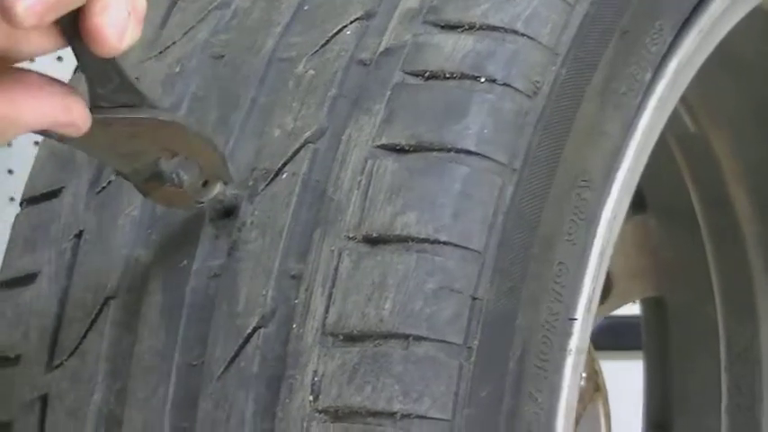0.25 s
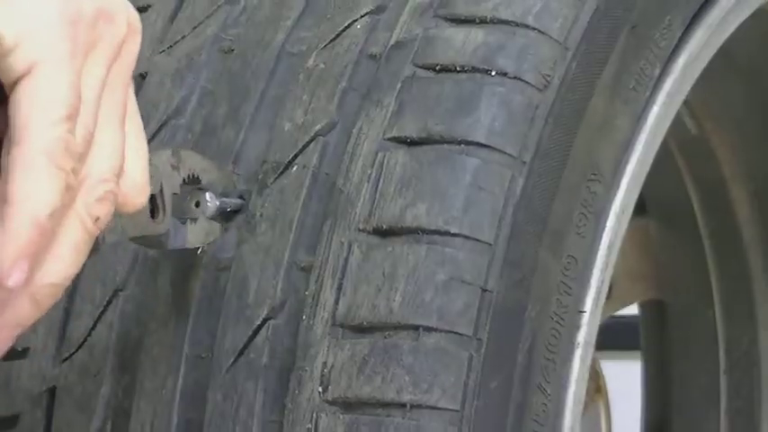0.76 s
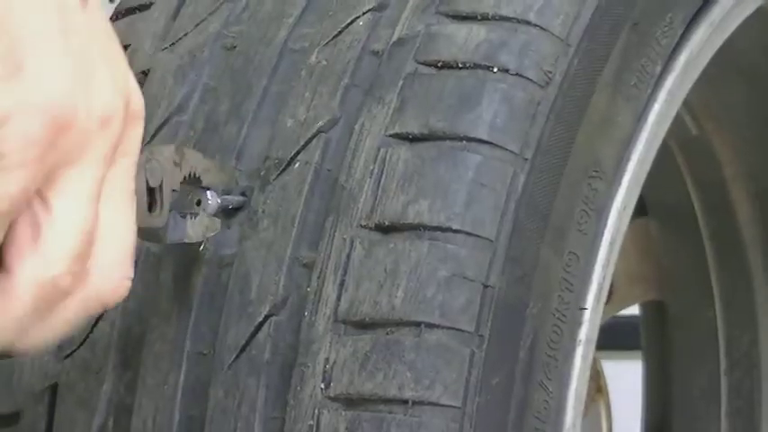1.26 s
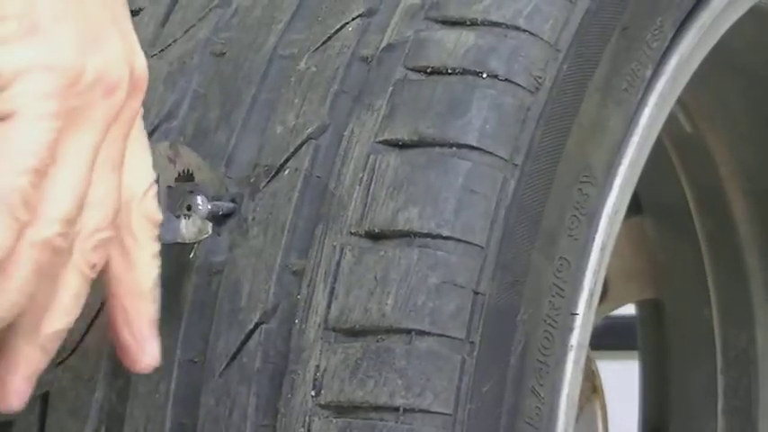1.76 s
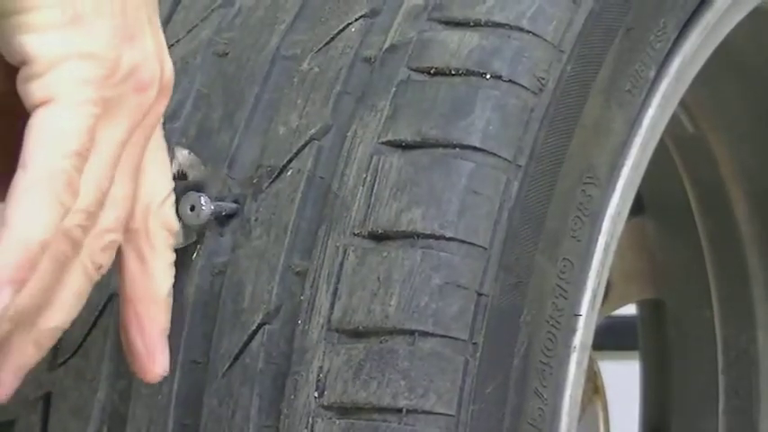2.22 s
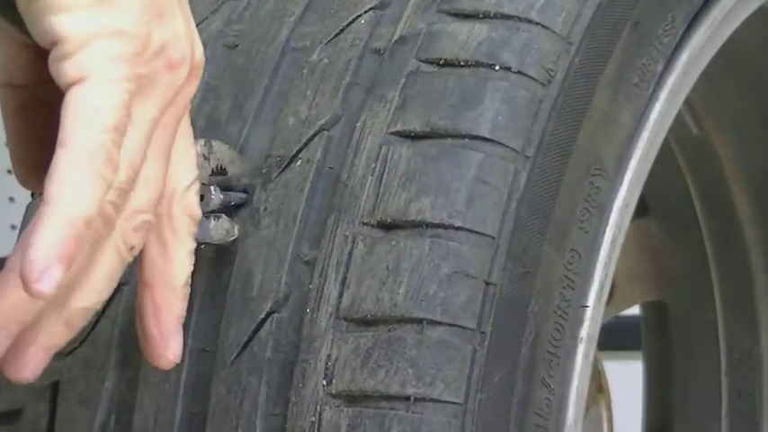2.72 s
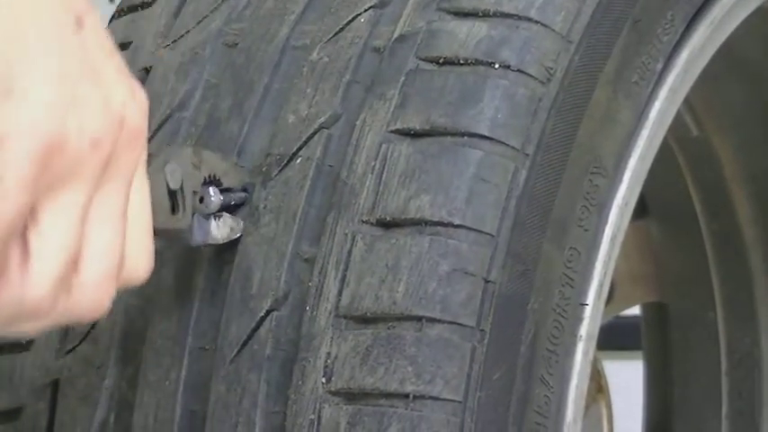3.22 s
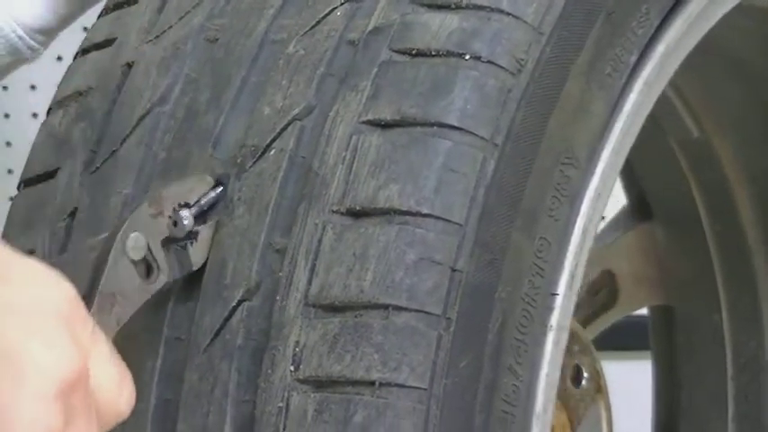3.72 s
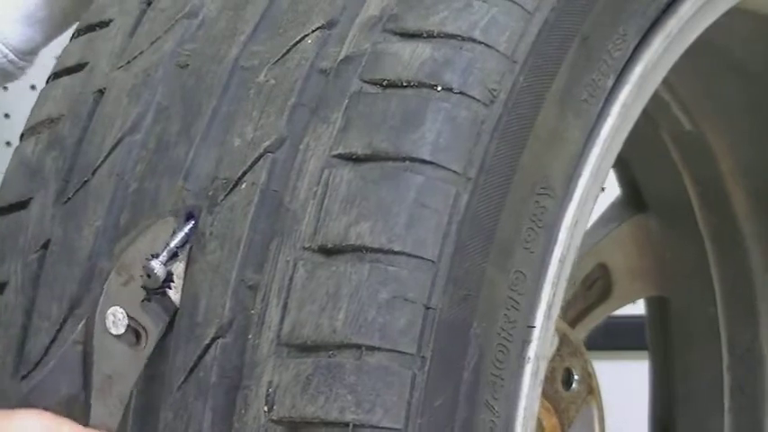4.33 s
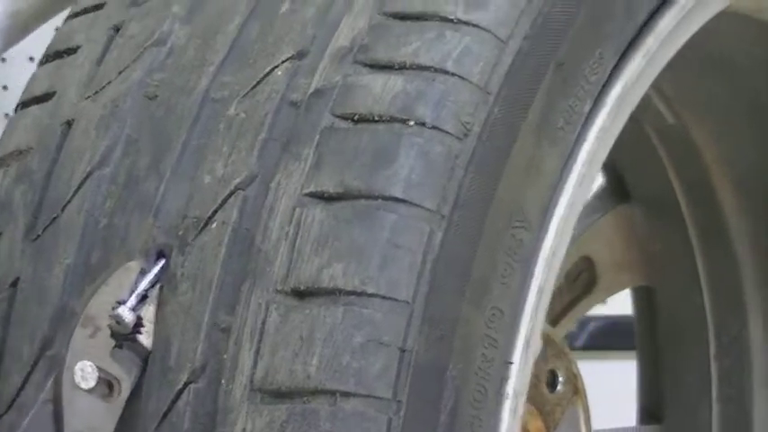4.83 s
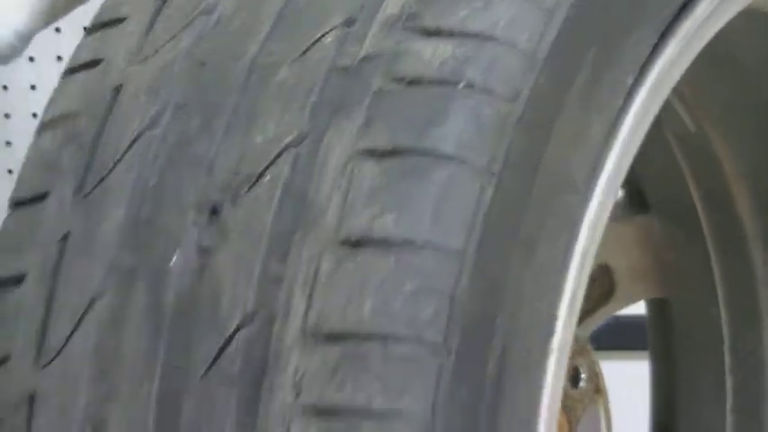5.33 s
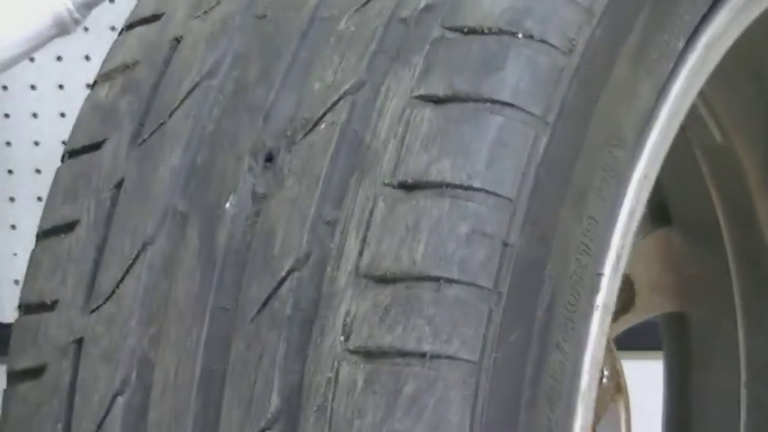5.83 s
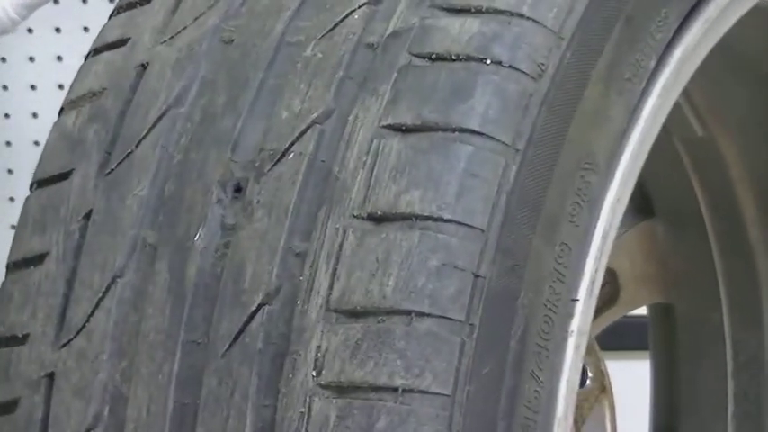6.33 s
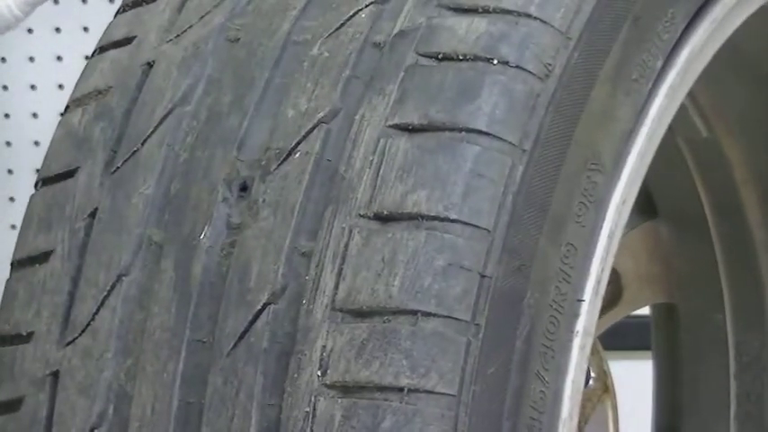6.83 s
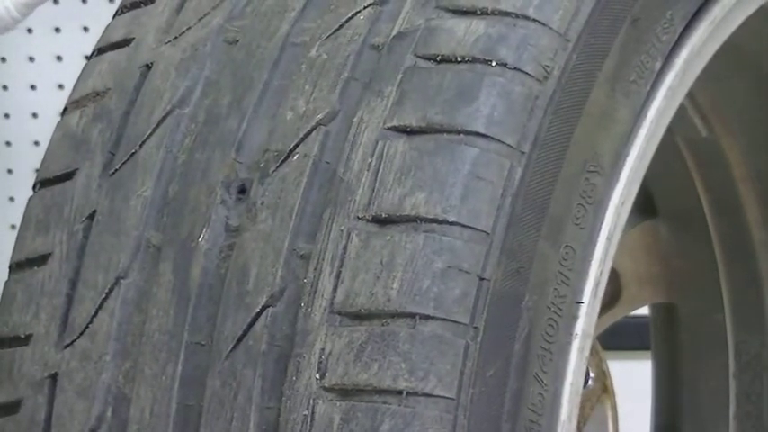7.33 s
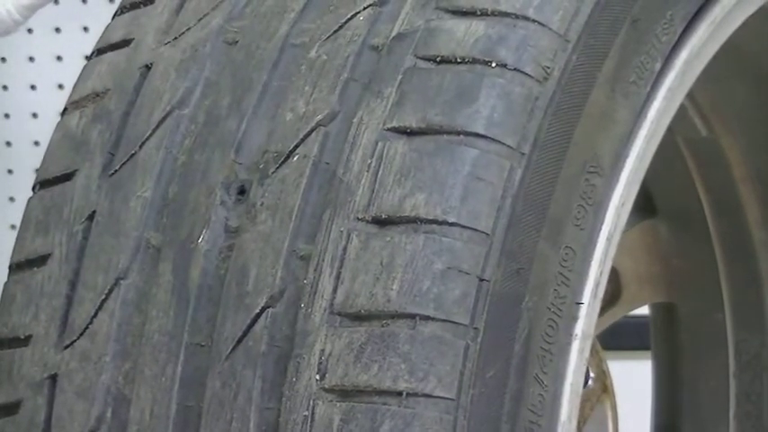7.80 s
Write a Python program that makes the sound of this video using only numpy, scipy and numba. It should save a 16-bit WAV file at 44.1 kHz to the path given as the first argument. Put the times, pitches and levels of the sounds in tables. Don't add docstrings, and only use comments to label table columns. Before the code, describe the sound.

Close clicks and scrapes on rubber, a thin whistle, swelling hiss, a sharp pop, then a steady loud rush of air and a clatter on a bench.

```python
import sys
import numpy as np
from scipy import signal
from scipy.fft import rfft, irfft, next_fast_len
from scipy.io import wavfile
from scipy.ndimage import uniform_filter1d
from numba import njit

SR = 44100
rng = np.random.default_rng(int(sys.argv[2]) if len(sys.argv) > 2 else 0)


def makeup_ratio(level_db):
    decades = np.asarray(level_db, float) / 20
    return 10 ** decades


def master(y):
    cut = np.clip(np.atleast_2d(y).T, -1, 1)
    pcm = np.round(cut * 32767)
    wavfile.write(sys.argv[1], SR, pcm.astype(np.int16))


N = 355357
TIME = np.arange(N) / SR
LONG = next_fast_len(N, True)


def gain_at(hz, points):
    f, db = np.transpose(points)
    return makeup_ratio(np.interp(np.log(hz + 1), np.log(f), db))


def colour(x, points):
    response = gain_at(np.fft.rfftfreq(LONG, 1 / SR), points)
    y = irfft(rfft(x, LONG) * response, LONG)[:N]
    return y / np.std(y)


def band(x, lo_hz, hi_hz):
    y = signal.sosfilt(signal.butter(2, [lo_hz, hi_hz], "band", fs=SR, output="sos"), x)
    return y / np.std(y)


def ramp(*corners):
    return np.interp(TIME, corners, [0] + [1] * (len(corners) - 2) + [0])


def curve(table):
    s, *columns = np.transpose(table)
    inside = (TIME > s[0]) & (TIME <= s[-1] + 0.01)
    gate = uniform_filter1d(1. * inside, size=200)
    return gate, [np.interp(TIME, s, c) for c in columns]


def walk(rate):
    k = int(SR / rate)
    held = np.repeat(rng.standard_normal(N // k + 1), k)
    return 0.63 * uniform_filter1d(uniform_filter1d(held, k), k)[:N]


def turbulence(points, flicker_db, rate, base_hz, per_octave):
    hz = np.fft.rfftfreq(LONG, 1 / SR)
    spectrum = rfft(colour(rng.standard_normal(N), points), LONG)
    place = np.clip(per_octave * np.log2(hz / base_hz + 1e-9), 0, 4)
    total = np.zeros(N)
    for k in range(5):
        share = np.clip(1 - abs(place - k), 0, 1)
        total += makeup_ratio(flicker_db * walk(rate)) * irfft(spectrum * share, LONG)[:N]
    return total


# (frequency [Hz], density [dB per Hz])
ROOM_COLOUR = [(18, -53), (30, -8), (114, -11.5), (237, -5.5), (379, -18.5), (656, -7.5), (897, -2.5),
               (1050, -24.5), (1290, -16), (1770, -8), (2360, 9.5), (2990, -7), (5170, -9), (12300, -9),
               (15500, -19)]


def room_tone():
    return makeup_ratio(-55.5) * turbulence(ROOM_COLOUR, 0.93, 5.2, 520, 1)


# (start [s], length [s], level [dB], brightness [dB])
STROKES = [
    (0.0, 0.045, -53.5, -2),
    (0.216, 0.23, -50.5, -4.5),
    (0.517, 0.24, -55, -8),
    (0.938, 0.32, -57, -23),
    (1.878, 0.32, -61.5, -22),
    (2.35, 0.42, -79.5, 16),
    (2.797, 0.37, -68.5, 4.5),
    (3.698, 0.12, -42.5, 2),
    (4.14, 0.19, -49, -10),
    (3.963, 2.4, -53.5, 5),
]


def rub():
    attack_s, release_s = 0.026, 0.048
    rest_end_s, rest_db, rest_bright_db = 5.2, -53.5, -22.5
    strokes = [(ramp(s - attack_s, s, s + length, s + length + release_s), db, bright_db)
               for s, length, db, bright_db in STROKES]
    rest = ramp(-attack_s, 0, rest_end_s, rest_end_s + release_s)
    strokes.append((rest, rest_db, rest_bright_db))
    low = sum(shape * makeup_ratio(db) for shape, db, _ in strokes)
    high = sum(shape * makeup_ratio(db + bright_db) for shape, db, bright_db in strokes)
    grit = rng.standard_normal(N) * makeup_ratio(3.1 * walk(120))
    treble = band(grit, 2330, 4820) + band(grit, 6800, 16700)
    return low * makeup_ratio(-4.0) * band(grit, 370, 2180) + high * treble


def ring(modes, chance, t):
    y = np.zeros(len(t))
    for (hz, db, t60), c, d in zip(modes, chance, chance[::-1]):
        y += makeup_ratio(db + 2 * c) * np.sin(2 * np.pi * hz * (1 + 0.012 * d) * t) * 1000. ** (-t / t60)
    return y / abs(y).max()


# (frequency [Hz], level [dB], decay t60 [s])
JAW_MODES = [(4000, -11, 0.017), (5850, 18, .03), (6030, 32, 0.023), (6600, -43, 0.0073),
             (8200, -25, 0.011), (10700, -8, .008)]


def strike(contacts, body, jaw_share, snap_hz):
    t = np.arange(SR // 3) / SR
    short = t[:SR // 20]
    direct, far = np.zeros(N + len(t)), np.zeros(N + len(t))
    for s, db, hz, thump_db, tick_db, wall_db in contacts:
        motion = np.sin(2 * np.pi * hz * short) * short * hz * np.exp(-short * hz / 0.55)
        blow = np.diff(motion, prepend=0)
        crack = rng.standard_normal(len(short)) * np.exp(-short / 0.0032)
        tick = jaw_share * ring(JAW_MODES, rng.standard_normal(6), short) + 0.027 * band(crack, 3500, 9500)
        snap = min(1, snap_hz / hz) ** 3 * band(crack, 640, snap_hz)
        judder = makeup_ratio(5.5 * np.interp(t, np.linspace(0, t[-1], num=40), rng.standard_normal(40)))
        thump = ring(body, rng.standard_normal(6), t) * judder * (1 - np.exp(-t / 0.0032))
        hit = makeup_ratio(db + 2.0) * blow / abs(blow).max() + makeup_ratio(tick_db + 14.5) * tick + makeup_ratio(db - 23) * snap
        at = int((s + 0.0008) * SR)
        direct[at:at + len(short)] += hit
        far[at:at + len(short)] += makeup_ratio(wall_db) * hit
        direct[at:at + len(t)] += makeup_ratio(thump_db + 8.0) * thump
        far[at:at + len(t)] += makeup_ratio(thump_db - 5) * thump
    return np.array([direct[:N], far[:N]])


# (frequency [Hz], level [dB], decay t60 [s])
TYRE_MODES = [(179, -17, 0.18), (251.3, 0.5, 0.28), (351.3, -5, 0.31), (390.3, -1, 0.32), (511, -14, 0.34),
              (690, -4, 0.09)]
# (time [s], peak [dB], centre of the blow [Hz], tyre thump [dB], steel tick [dB])
GRIPS = [(0.379, -33.5, 2840, -72, -62), (0.414, -41, 1260, -78.5, -55), (0.532, -43, 1160, -57, -45.5),
         (0.616, -32, 2390, -66, -30.5), (0.63, -48, 1130, -58, -37), (0.739, -33, 890, -46.5, -46),
         (0.761, -34.5, 1130, -41, -59), (0.979, -39, 820, -45, -50), (1.116, -32, 1030, -45.5, -45),
         (1.29, -54, 2490, -66, -56), (1.358, -41.5, 1100, -49.5, -59), (1.517, -32.5, 1200, -37.5, -66),
         (1.816, -55, 895, -58, -66), (1.859, -45, 1200, -51.5, -64), (2.02, -35, 770, -37.5, -70),
         (2.068, -37.5, 1480, -68, -65), (2.321, -33.5, 3150, -58.5, -41.5),
         (2.47, -32.5, 1060, -46.5, -62), (2.721, -43, 1290, -63, -61), (2.906, -37.5, 1290, -49, -48),
         (2.945, -39, 1180, -48, -60), (3.475, -40, 2200, -70, -59), (3.518, -33.5, 1890, -72, -58)]


def grips():
    return strike([(*row, -0.5) for row in GRIPS], TYRE_MODES, 0.35, 4500)


def floor_shake(knock):
    return makeup_ratio(-54.5) * band(abs(band(knock, 150, 620)), 18, 290)


# (centre [Hz], decay t60 [s], level [dB])
WALL_BANDS = [(137, 0.46, 6), (405, 0.54, 1), (1000, 0.43, 1), (2220, 0.7, -4.5), (4500, 0.78, -12),
              (8450, 0.22, -4.5)]


def walls(x):
    t = np.arange(SR) / SR
    answers = []
    for _ in range(2):
        tail = np.zeros(SR)
        for hz, t60, db in WALL_BANDS:
            noise = band(rng.standard_normal(SR), hz / 1.46, hz * 1.61)
            tail += noise * makeup_ratio(db) * np.sqrt(hz / 9000) * 1000. ** (-t / t60)
        answers.append(signal.oaconvolve(x, tail * np.clip(t / 0.00067, 0, 1))[:N])
    return answers


# (time [s], pitch [Hz], level [dB], octave [dB], pitch scatter [share])
EDGE_TONE = [
    (2.32, 4590, -63, -3, 0.042),
    (2.38, 4540, -60, -7, 0.04),
    (2.52, 4730, -62, -16, 0.04),
    (2.62, 4970, -69, -25, .045),
    (2.75, 4800, -66, -34, .045),
    (2.87, 4980, -68, -25, 0.05),
    (2.96, 5400, -64, -25, .08),
]


def whistle():
    gate, (hz, db, octave_db, scatter) = curve(EDGE_TONE)
    phase = 2 * np.pi * np.cumsum(hz * (1 + 1.4 * scatter * walk(1500))) / SR
    tone = np.sin(phase) + makeup_ratio(octave_db) * np.sin(2 * phase)
    return gate * makeup_ratio(db + 7 + 4.5 * walk(150)) * tone


# (time [s], flow [dB])
EARLY_LEAK = [
    (2.5, -76),
    (3.14, -54.5),
    (3.22, -68),
]
# (time [s], flow [dB], width of the gap [0-1])
THREAD_FLOW = [
    (3.36, -65, .3),
    (3.46, -56.5, 1),
    (3.64, -47, 0.75),
    (3.77, -41, 1.25),
    (3.85, -34.5, 0.84),
    (3.95, -37.5, 0.36),
    (4.62, -32, 0.68),
    (5.18, -33, 0.74),
    (5.22, -29, 0.61),
]
# (release [s], length [s], swell [dB])
TURNS = [
    (3.96, 0.026, 8.5),
    (4.127, 0.24, 3),
    (4.253, 0.057, 5.5),
    (4.38, 0.22, 4.5),
    (4.465, 0.11, 5),
    (4.597, 0.13, 4),
]
# (frequency [Hz], density [dB per Hz])
GAP_COLOUR = [(2350, -39), (4000, 6.5), (5270, -0.5), (5970, 0), (7780, 2.5), (8370, 3), (9010, 2.5),
              (9860, 5.5), (12200, 7), (14700, 13), (15400, 15)]


def seep():
    gate, (flow_db, gap) = curve(THREAD_FLOW)
    spring_back_s = 0.012
    flow_db = flow_db + sum(db * ramp(s - length, s, s + spring_back_s) for s, length, db in TURNS)
    first_gate, (first_db,) = curve(EARLY_LEAK)
    flow = first_gate * makeup_ratio(first_db) + gate * makeup_ratio(flow_db)
    gap = np.where(first_gate > 0, 1, gap)
    hiss = turbulence(GAP_COLOUR, 0.6, 13, 5800, 1.0)
    low_db = -24 + 24 * gap
    return flow * (band(hiss, 7980, 12100) + makeup_ratio(low_db) * band(hiss, 5650, 9420))


# (time [s], peak [dB], centre [Hz], steel tick [dB])
POPS = [
    (3.6792, -11.5, 1830, -16.5),
    (3.6835, -14.5, 1160, -29),
    (3.7447, -1, 1135, -8.5),
    (3.747, -21, 513, -19),
    (5.2395, -8.5, 1460, -30),
    (5.2415, -10.5, 1076, -44),
    (5.254, -19, 460, -50),
    (5.307, -28.5, 318, -55),
    (5.801, -52.5, 278, -60),
    (7.37, -41.5, 479, -60),
]


def pops():
    contacts = []
    for s, db, hz, tick_db in POPS:
        octave = np.log2(hz / 1000)
        contacts.append((s, db, hz, db - 24.5 - 10.5 * octave, tick_db, 1.5 - 2 * octave))
    return strike(contacts, TYRE_MODES, 0.06, 4000)


# (time [s], peak [dB], centre [Hz], steel tick [dB])
JAW_SLIPS = [(3.91, -28, 1110, -36), (3.939, -25, 10500, -39), (4.044, -46, 1720, -32),
             (4.079, -29.5, 1930, -33), (4.166, -30.5, 990, -48), (4.192, -34, 1090, -31),
             (4.228, -31.5, 1020, -38), (4.281, -28.5, 1100, -49), (4.317, -28, 2160, -31),
             (4.359, -46, 1210, -25), (4.379, -25.5, 3470, -37), (4.406, -42, 1030, -37),
             (4.459, -35, 2440, -47), (4.535, -37, 2140, -31), (4.569, -12, 9000, -42),
             (4.6, -28.5, 1290, -53)]


def slips():
    start_s, thump_db, fade_db_per_s = JAW_SLIPS[0][0], -35.5, 87
    contacts = [(s, db, hz, thump_db - fade_db_per_s * (s - start_s), tick_db, -2)
                for s, db, hz, tick_db in JAW_SLIPS]
    return strike(contacts, TYRE_MODES, 0.12, 4500)


# (frequency [Hz], density [dB per Hz])
FREE_COLOUR = [(59, -76), (100, -48), (228, -62), (264, -41), (347, -33), (1020, -19), (1210, -18),
               (1660, -11), (2930, -10.5), (4020, -6.5), (5280, -8.5), (5870, -4.5), (10200, 0.5),
               (13100, -2), (15500, -11.5)]
# (centre [Hz], width [Hz], level [dB])
GROOVE_BANDS = [(4340, 820, -11), (5980, 360, -11), (6830, 220, -4), (8340, 360, -7), (9520, 1000, -2),
                (10260, 260, -2.5), (11170, 1100, 0.5)]
# (time [s], depth [dB])
GAIN_DIPS = [
    (5.245, 3.5),
    (7.549, 6.5),
    (7.675, 5.5),
]


def jet():
    tip_leaves_s, tip_db, tip_rise_db_per_s = 5.17, -36, 137
    open_s, burst_db, burst_s = 5.237, 9.5, 0.0042
    fall_s, recover_s = 0.0063, 0.1
    since = TIME - open_s
    open_db = -19 + 0.23 * since + burst_db * ramp(open_s, open_s + burst_s, open_s + 2 * burst_s)
    open_db = open_db - sum(db * ramp(s, s + fall_s, s + fall_s + recover_s) for s, db in GAIN_DIPS)
    jet_db = np.where(since < 0, tip_db + tip_rise_db_per_s * (TIME - tip_leaves_s), open_db)
    free = turbulence(FREE_COLOUR, 0.35, 9.7, 2380, 1.2)
    grooves = sum(makeup_ratio(db + 5 * walk(3.37)) * band(free, hz - width / 2, hz + width / 2)
                  for hz, width, db in GROOVE_BANDS)
    return (TIME > tip_leaves_s) * makeup_ratio(jet_db + 0.27) * (free + makeup_ratio(-21) * grooves)


# (frequency [Hz], level [dB], decay t60 [s])
BENCH_MODES = [(396.5, 2.5, 0.094), (336, -12, 0.035), (594, -0.5, 0.09), (945, -23, .05),
               (1200, -2, 0.062), (1683, -3, 0.048)]
# (time [s], peak [dB], centre [Hz], bench top [dB])
TOOL_BLOWS = [(7.494, -14.5, 945, -38), (7.496, -33, 950, -26), (7.546, -7.5, 830, -13.5),
              (7.55, -14, 1200, -8), (7.6, -18, 1090, -18.5), (7.639, -19, 802, -25),
              (7.669, -4, 1350, -34), (7.672, -3, 1110, -33), (7.692, -5, 1010, -30),
              (7.706, -13.5, 960, -38), (7.718, -14.5, 1010, -41), (7.734, -16, 1120, -28.5),
              (7.749, -12, 1110, -43),
              (7.5475, -13, 1720, -35),
    (7.563, -21, 1500, -9),
]


def bench():
    contacts = [(*row, -40, 1.5) for row in TOOL_BLOWS]
    return strike(contacts, BENCH_MODES, 0, 2700)


def aside(x, width):
    t = np.arange(SR // 4) / SR
    scatter = rng.standard_normal(len(t)) * np.exp(-t / 0.037)
    scatter = scatter / np.linalg.norm(scatter)
    hz = np.fft.rfftfreq(LONG, 1 / SR)
    return irfft(rfft(x, LONG) * rfft(scatter, LONG) * gain_at(hz, width), LONG)[:N]


# (frequency [Hz], side minus mid [dB])
ROOM_WIDTH = [(60, -6), (110, -3), (200, -10), (380, -1.5), (700, -6), (1290, -2.5), (2380, -15),
              (4400, -8), (8120, -19), (15000, -34)]
# (frequency [Hz], side minus mid [dB])
AIR_WIDTH = [(60, -10), (300, -34), (1200, -59), (2600, -29), (3500, -17.5), (4800, -19.5), (6000, -22),
             (9500, -32), (11500, -24.5), (13000, -29), (15000, -50)]


def scene():
    room, hands = room_tone(), rub()
    direct, far = grips() + pops() + slips() + bench()
    wet_mid, wet_side = walls(far)
    leak = whistle() + seep() + jet()
    knock = direct + makeup_ratio(-34.5) * wet_mid
    mid = knock + floor_shake(knock) + leak + room + hands
    side = makeup_ratio(-60.5) * wet_side + makeup_ratio(-21) * np.diff(direct, prepend=0)
    side = side + aside(leak, AIR_WIDTH) + aside(room + makeup_ratio(-7) * hands, ROOM_WIDTH)
    return np.array([mid + side, mid - side])


@njit
def follow(x, attack, release):
    y, e = np.empty(len(x)), 0.
    for i in range(len(x)):
        e += (x[i] - e) * (attack if x[i] > e else release)
        y[i] = e
    return y


def top_cut(x):
    return signal.sosfilt(signal.butter(12, 16500, fs=SR, output="sos"), x)


def record(dry):
    x = signal.sosfilt(signal.butter(1, 90, "high", fs=SR, output="sos"), dry)
    attack_s, release_s = 0.00047, 0.07
    env = follow(abs(x).max(axis=0), 1 / (attack_s * SR), 1 / (release_s * SR))
    x = x * np.minimum(1, makeup_ratio(-6) / (env + 1e-9)) ** 0.24
    x = 1.118 * np.tanh(x / 1.057)
    x = signal.sosfilt(signal.ellip(10, 0.2, 75, 15400, fs=SR, output="sos"), x)
    return top_cut(0.89 * x)


dry = scene()
out = record(dry)
master(out)
```